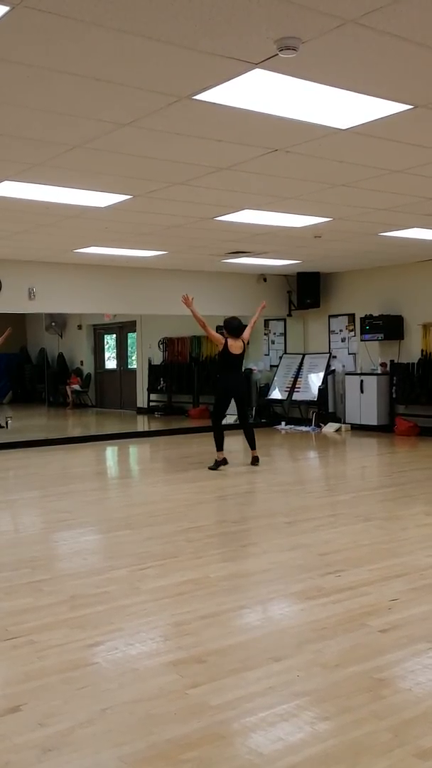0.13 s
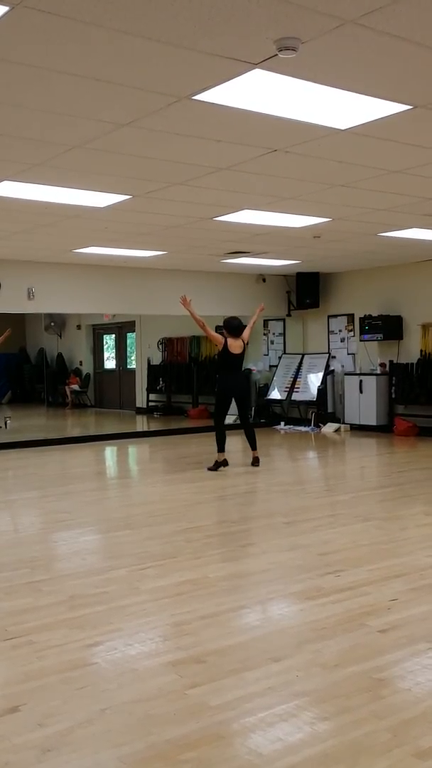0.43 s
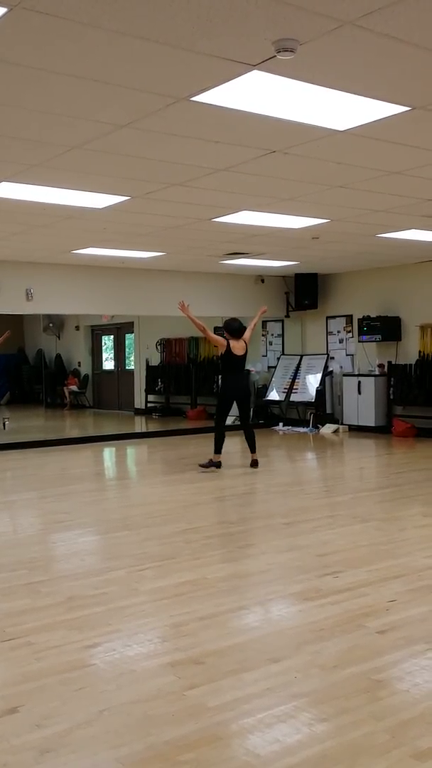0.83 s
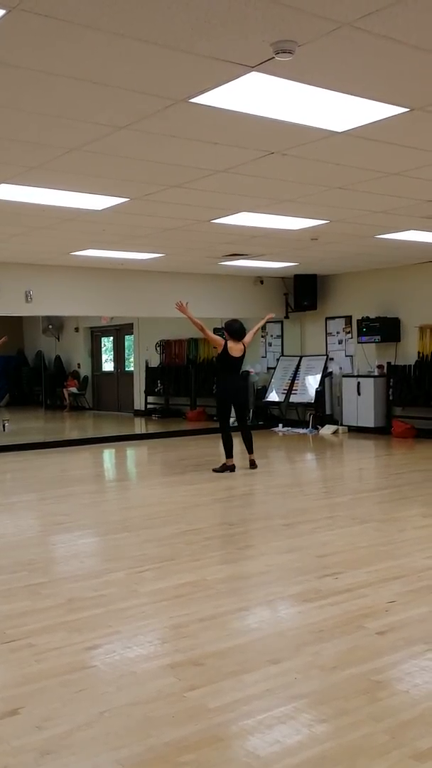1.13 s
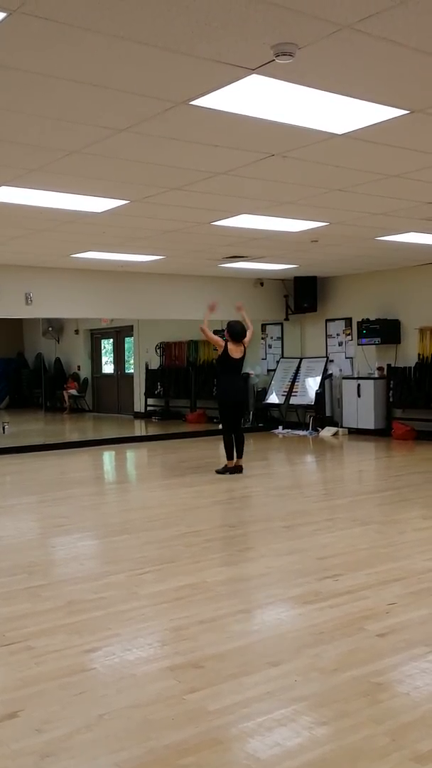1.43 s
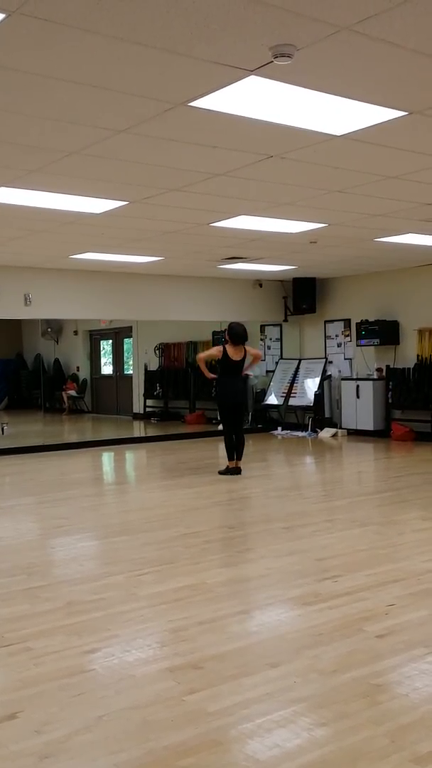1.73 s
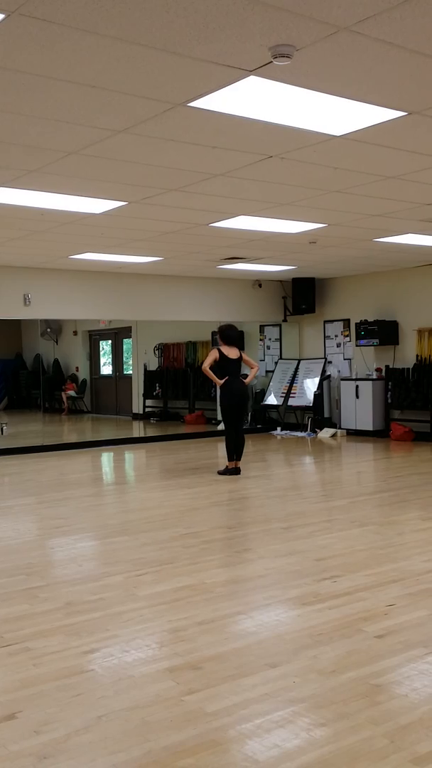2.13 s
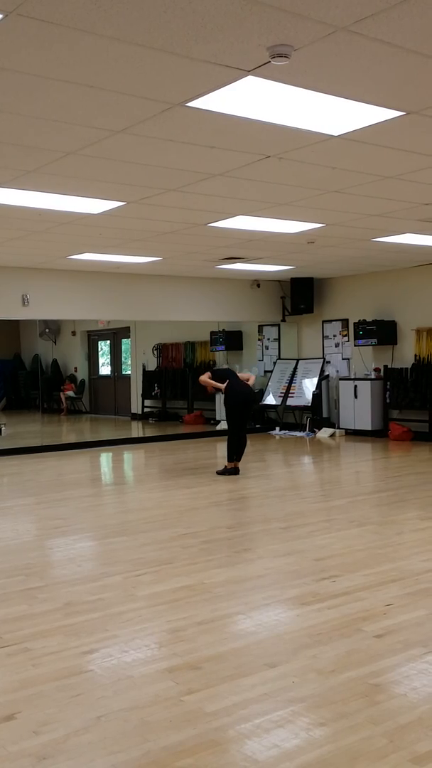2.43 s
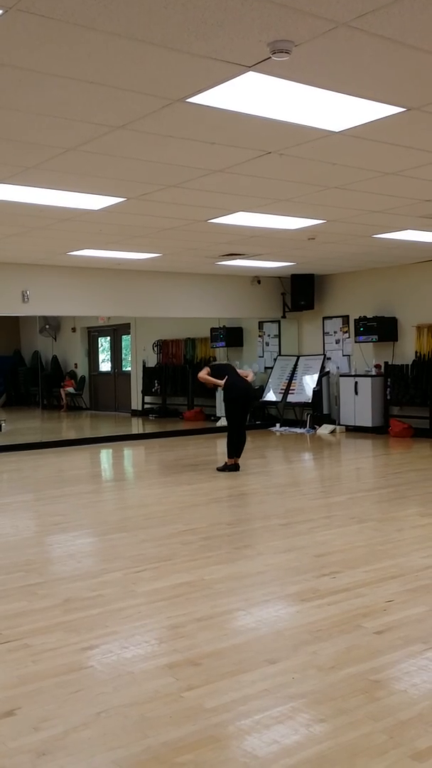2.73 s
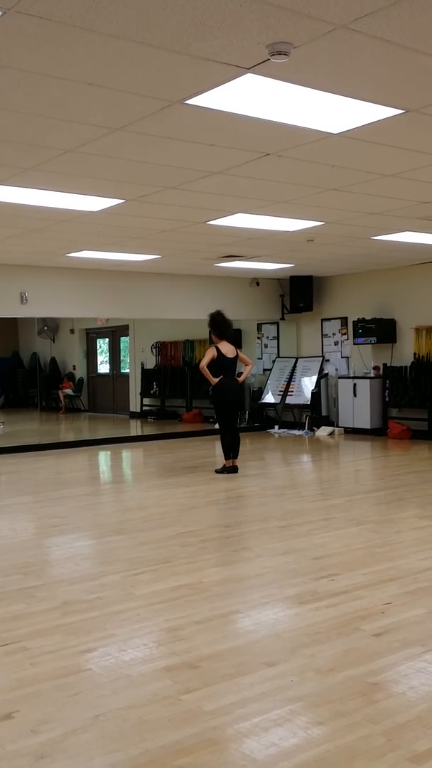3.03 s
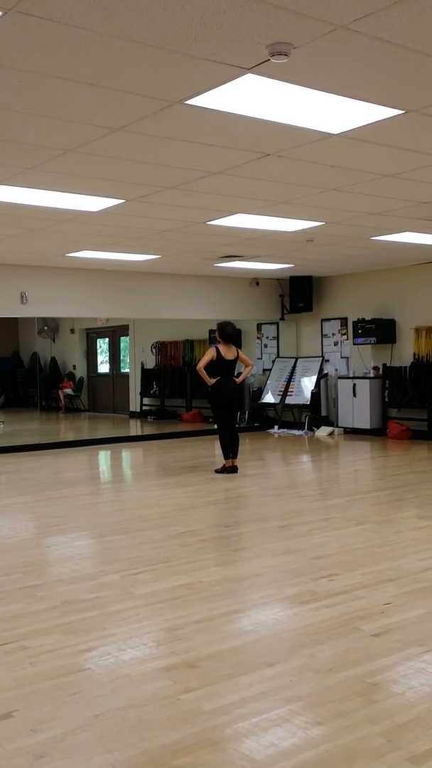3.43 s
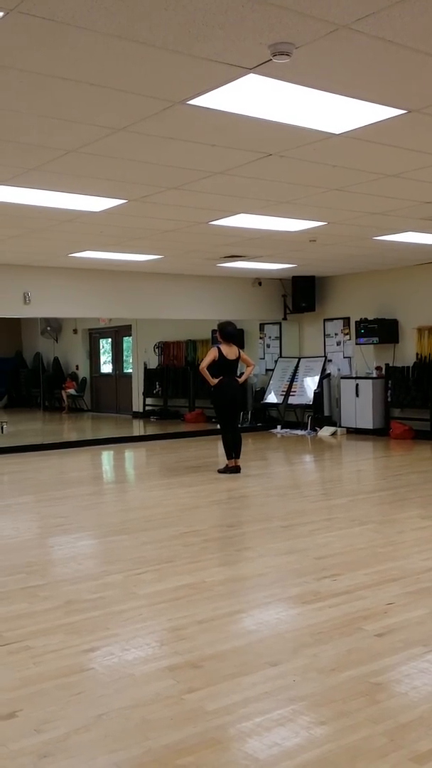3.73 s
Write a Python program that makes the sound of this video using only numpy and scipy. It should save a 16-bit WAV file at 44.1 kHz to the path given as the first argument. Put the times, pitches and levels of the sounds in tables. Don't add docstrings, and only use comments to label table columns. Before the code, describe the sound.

Quick, evenly spaced tap-shoe cracks ring through a dance studio and fade into faint shuffles.

```python
import sys
import numpy as np
from scipy import signal
from scipy.fft import rfft, irfft, next_fast_len
from scipy.io import wavfile
from scipy.ndimage import map_coordinates

SR = 44100
rng = np.random.default_rng(int(sys.argv[2]) if len(sys.argv) > 2 else 0)


def store_pcm(level_fs):
    pcm = np.round(np.clip(level_fs, -1, 1) * 32767).astype(np.int16)
    wavfile.write(sys.argv[1], SR, np.atleast_2d(pcm).T)


def linear_from_db(decibels):
    return 10 ** (np.asarray(decibels, float) / 20)


N = 176400


def unit(x):
    return x / np.sqrt(np.mean(x ** 2) + 1e-20)


def along(points, hz):
    f, value = np.transpose(points)
    return np.interp(np.log(hz + 1), np.log(f + 1), value)


def wobble(rate):
    knots = rng.standard_normal(int(N * rate / SR) + 4)
    return map_coordinates(knots, [np.arange(N) * rate / SR])


def filtered(x, response):
    n = x.shape[-1]
    m = next_fast_len(n + SR // 4)
    hz = np.fft.rfftfreq(m, 1 / SR)
    return irfft(rfft(x, m) * response(hz), m)[..., :n]


def resonances(rows):
    def response(f):
        total = 0
        for k, (centre, width, db) in enumerate(rows):
            ring = 1j * f * width / (centre ** 2 - f ** 2 + 1j * f * width)
            total = total + (-1) ** k * linear_from_db(db) * ring
        return total
    return response


def struck(rows):
    def response(f):
        power = sum(np.abs(resonances([row])(f)) ** 4 / linear_from_db(2 * row[2]) for row in rows)
        cepstrum = irfft(np.log(power + 1e-12) / 2)
        cepstrum[1:len(f) - 1] *= 2
        cepstrum[len(f):] = 0
        return np.exp(rfft(cepstrum))
    return response


def pair(n, alike):
    def mid_and_side(hz):
        turn = np.arccos(np.clip(along(alike, hz), -1, 1)) / 2
        return np.array([np.cos(turn), np.sin(turn)])
    mid, side = filtered(rng.standard_normal((2, n)), mid_and_side)
    return np.array([mid + side, mid - side])


# t/s, level/dB, smear t60/s
BOUNCES = [(.0001, 1.5, 0.0073), (.0026, 3.5, 0.0051), (.0056, 5.5, 0.0086), (0.013, -4.5, .014),
           (0.0173, -1, .012), (0.0227, 5.5, 0.047), (0.033, -0.5, .03), (.052, -10, .03)]
# f/Hz, t60/s
ROOM_T60 = [(100, .58), (500, .54), (2500, .53), (7500, .5), (11500, .44), (14000, .35)]
# f/Hz, likeness
ROOM_ALIKE = [(40, 0.54), (150, 0.99), (400, .7), (1000, .4), (3000, 0.12)]
# f/Hz, level/dB
WALL_TONE = [(150, -2.44), (800, -2), (2500, -1.5), (7500, -1.66), (12000, -0.95)]


def studio():
    tail_db, build_s, direct_db = 11.5, 0.016, -4
    hz, t, z = signal.stft(pair(SR, ROOM_ALIKE), SR, nperseg=256)
    fade_db = along(WALL_TONE, hz)[:, None] - 60 * t / along(ROOM_T60, hz)[:, None]
    tail = signal.istft(z * linear_from_db(fade_db), SR, nperseg=256)[1][:, :SR]
    t = np.arange(SR) / SR
    tail = tail * (1 - np.exp(-t / build_s))
    answer = linear_from_db(tail_db) * tail / np.linalg.norm(tail[0])
    answer[:, 0] = linear_from_db(direct_db)
    length = SR // 20
    for s, db, t60 in BOUNCES:
        wall = pair(length, ROOM_ALIKE) * linear_from_db(-60 * t[:length] / t60)
        start = round(s * SR)
        answer[:, start:start + length] += linear_from_db(db) * wall / np.linalg.norm(wall[0])
    return answer


# t/s, level/dB, floor boom/dB, left-right/dB, low plate f/Hz
TAPS = [(-.022, 3, -5, .1, 1856), (0.1246, 3.14, -5, -0.4, 1940), (0.2816, 10, -9, 1.2, 2500),
        (0.4261, 11.5, -7.5, -0.2, 2435), (0.5783, 6, 2, -0.2, 2260), (0.7168, 1, 0.5, 0.7, 1935),
        (.8849, 7, -1.5, 0.2, 2710), (1.4505, -35, -3, -1, 2560), (1.685, -59.5, -1.8, -1.4, 1450),
        (1.742, -61, 0, -1.5, 1789), (1.82, -61.5, -3.3, -1, 1500), (2.79, -62, -1.2, -0.3, 1503),
        (2.86, -61, -1, .1, 1519), (3.49, -63, -1.2, -3.6, 1510), (3.63, -67, -1, -3, 1510),
        (3.71, -64, -1.7, -0.7, 1484)]
# board/dB, low plate/dB, high plate/dB, edge/dB, click f/Hz
PARTS = [(-2.5, 1.46, 2.9, -16, 7400), (-6.5, -3.1, -6, -9, 7940), (-2.5, 3.6, -6, -16, 7390),
         (-5, 1, -5.5, -14.5, 7380), (0.5, 8.4, 1, -20.5, 7100), (-2.5, 0.25, -6.5, -5, 6700),
         (-0.5, -5.5, -5.5, -16.5, 7950), (4.5, 7.5, 3.1, -15.5, 7800), (17.5, 3, -5, -19, 7600),
         (24.5, 4.5, -8, -13, 7600), (19.5, 5, -5, -15, 7600), (19.1, -3, -2.5, -8, 7600),
         (15, -3.5, -6.5, -17, 9300), (16, 3, -9, -19, 7600), (19.1, -1, -11.5, -15, 7600),
         (13, 1, -9, -14.5, 7600)]
HIGH_PLATE_HZ = [3891, 4550, 4300, 4370, 4480, 4214, 5002, 4105] + [4300] * 8
# f/Hz, width/Hz, level/dB
FLOOR_BOOM = [(144.2, 31, 13), (174, 31, 13.5), (328, 70, -1)]
# f/Hz, level/dB
TAP_BALANCE = [(60, .5), (180, -.8), (400, -2.4), (1500, -1.2), (5000, 1.6), (9000, -4), (13000, -.2)]
# f/Hz, width/Hz, level/dB
CONTACT = (3000, 5600, -8)


def taps():
    shuffle_below_db, shuffle_t60_s, shuffle_gain_db = -45, 0.45, 3.5
    top_hz = 14400
    out = np.zeros((2, N + 3 * SR))
    blow = np.zeros(SR // 5)
    blow[0] = 1
    t = np.arange(SR) / SR
    for tap, parts, high_hz in zip(TAPS, PARTS, HIGH_PLATE_HZ):
        s, db, boom_db, pan_db, low_hz = tap
        board_db, low_db, high_db, edge_db, click_hz = parts
        shoe = [(621, 994, board_db), (low_hz, 800, low_db), (high_hz, 1200, high_db), CONTACT,
                (click_hz, 1800, 0), (11700, 5200, edge_db)]
        floor = linear_from_db(boom_db) * filtered(blow, resonances(FLOOR_BOOM))
        knock = filtered(blow, struck(shoe)) + floor
        room = studio()
        if db < shuffle_below_db:
            room = room * linear_from_db(shuffle_gain_db - 60 * t / shuffle_t60_s)
        sides = linear_from_db(np.array([[db + pan_db / 2], [db - pan_db / 2]]))
        wet = signal.fftconvolve(knock[None], room, axes=1) * sides
        start = SR + round(s * SR)
        out[:, start:start + wet.shape[1]] += wet

    def lean_and_top(hz):
        lean = linear_from_db(np.outer([.5, -.5], along(TAP_BALANCE, hz)))
        return lean / (1 + (hz / top_hz) ** 24)
    return filtered(out[:, SR:SR + N], lean_and_top)


# f/Hz, level/dB per Hz
AIR = [(15, -67), (25, -14), (134, -1.5), (220, -4.5), (290, -17.5), (327, -7), (356, -13), (430, -17.5),
       (1500, -25.5), (1950, -69), (3300, -120)]
# f/Hz, level/dB per Hz
HISS = [(590, -9), (1000, -39.5), (1480, -9), (1750, -9.5), (4460, -10.5), (5510, -10), (7360, 4),
        (9200, -9), (14400, -16.5)]
# f/Hz, likeness
AIR_ALIKE = [(60, 1), (230, 0.72), (910, 0.26), (3570, -0.43), (13900, -0.03)]
HISS_ALIKE = [(1000, 0.3), (10000, .05)]
# f/Hz, level/dB
FAN = [(323.0, -78)]


def background():
    air_db, hiss_db, pan_db = -69, -72, 2.5
    t = np.arange(N) / SR
    air = unit(filtered(pair(N, AIR_ALIKE), lambda hz: linear_from_db(along(AIR, hz))))
    air = air * linear_from_db(air_db + 1.2 * wobble(5))
    hiss = unit(filtered(pair(N, HISS_ALIKE), lambda hz: linear_from_db(along(HISS, hz)))) * linear_from_db(hiss_db)
    fan = 0
    for hz, db in FAN:
        level = linear_from_db(db + 3 + 2.5 * wobble(4))
        fan = fan + level * np.sin(2 * np.pi * hz * t + .5 * wobble(5))
    return (air + hiss + fan) * linear_from_db(np.array([[pan_db / 2], [-pan_db / 2]]))


# t/s, f/Hz, level/dB
DRONE = [
    (.45, 179, -37),
    (.48, 191.8, -30),
    (0.519, 203.6, -24),
    (0.571, 204.3, -25),
    (0.642, 199.9, -23.5),
    (.7, 197.8, -30.5),
    (.81, 202, -31.5),
    (.875, 200, -40),
]
# t/s, f/Hz, level/dB, t60/s
DRONE_RINGS = [(.465, 330, -24, .3), (.485, 1085, -33, .2), (.515, 925, -32, .8), (.53, 256, -32, 1.2)]


def drone():
    t = np.arange(N) / SR
    s, hz, db = np.transpose(DRONE)
    inside = np.clip(np.minimum(t - s[0], s[-1] - t) / .02, 0, 1)
    level = linear_from_db(np.interp(t, s, db) + 3 + 3.5 * wobble(45))
    phase = 2 * np.pi * np.cumsum(np.interp(t, s, hz)) / SR
    hum = level * inside * np.sin(phase + .7 * wobble(22))
    for start, ring_hz, ring_db, t60 in DRONE_RINGS:
        u = np.clip(t - start, 0, None)
        swell = 1 - np.exp(-u / 0.014)
        hum = hum + linear_from_db(ring_db - 60 * u / t60) * swell * np.sin(2 * np.pi * ring_hz * u)
    return hum * linear_from_db(np.array([[-.4], [.4]]))


# start t/s, peak t/s, end t/s, level/dB
SLIDE = (1.16, 1.36, 1.47, -62)
# f/Hz, width/Hz, level/dB
SLIDE_BANDS = [(3930, 2500, -4), (8430, 650, 3.9), (12500, 4000, -12.5)]


def slide():
    *times, db = SLIDE
    shape = np.interp(np.arange(N) / SR, times, [0, 1, 0])
    rub = unit(filtered(pair(N, HISS_ALIKE), resonances(SLIDE_BANDS)))
    return linear_from_db(db + 0.83 * wobble(40)) * shape * rub


def scene():
    return taps() + background() + drone() + slide()


def band_limit(x):
    return signal.sosfilt(signal.butter(12, 14530, fs=SR, output="sos"), x)


def record(dry):
    loud_db, duck_db, duck_ahead_s = -20, -1.5, 0.036
    top_hz, fall_hz_per_s, after_s, until_s = 13500, 6500, 0.009, 1.17
    t = np.arange(N) / SR
    loud = np.array([row[0] for row in TAPS if row[1] > loud_db])
    dip_db = sum(duck_db * np.clip(1 - (s - t) / duck_ahead_s, 0, 1) * (t < s) for s in loud)
    hz, frame, z = signal.stft(dry * linear_from_db(dip_db), SR, nperseg=512)
    since = frame - loud[np.searchsorted(loud, frame + after_s / 2) - 1]
    too_high = hz[:, None] > top_hz - fall_hz_per_s * since
    lost = too_high & (since > after_s) & (frame < until_s)
    mix = signal.istft(z * ~lost, SR, nperseg=512)[1][:, :N]
    return band_limit(mix)


dry = scene()
out = record(dry)
store_pcm(out)
```